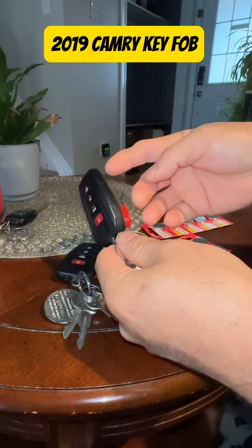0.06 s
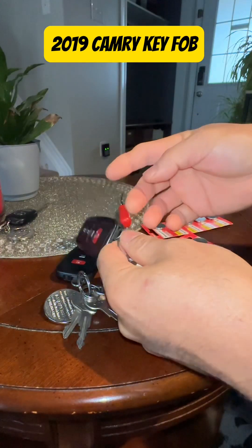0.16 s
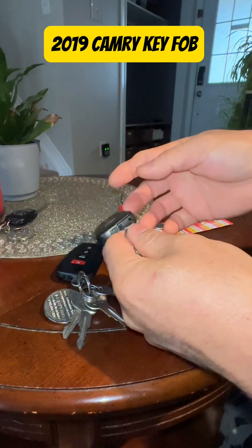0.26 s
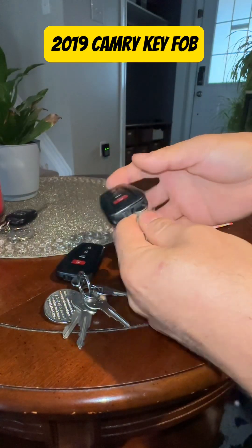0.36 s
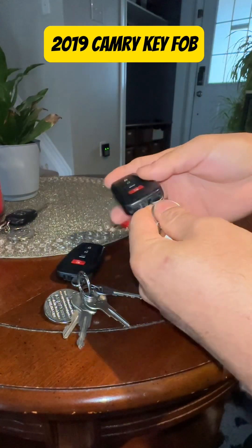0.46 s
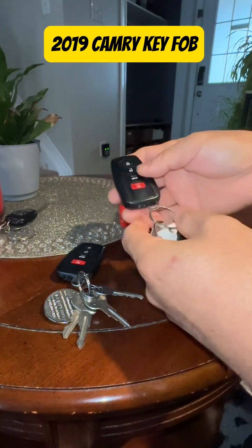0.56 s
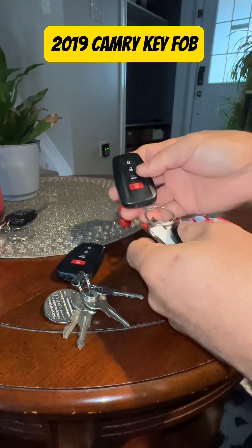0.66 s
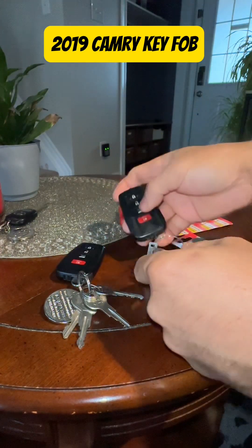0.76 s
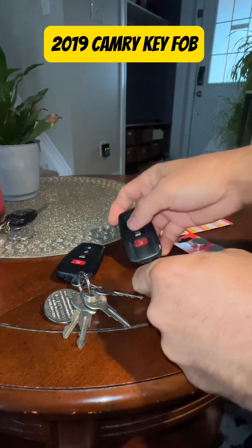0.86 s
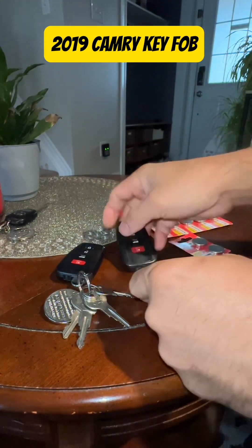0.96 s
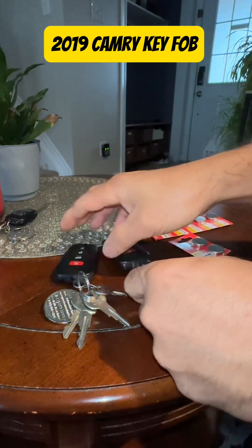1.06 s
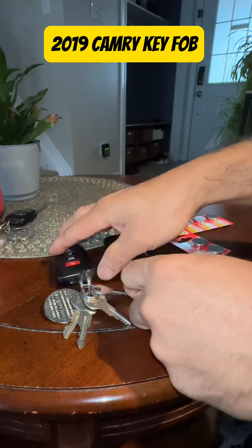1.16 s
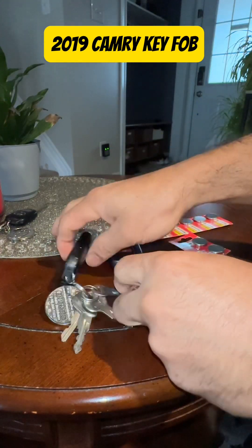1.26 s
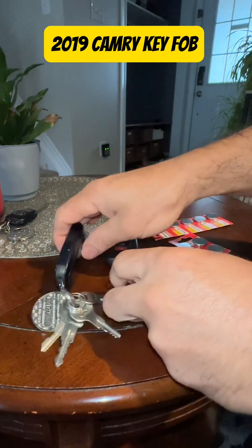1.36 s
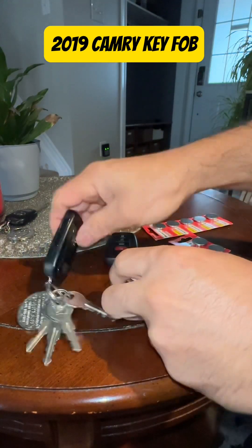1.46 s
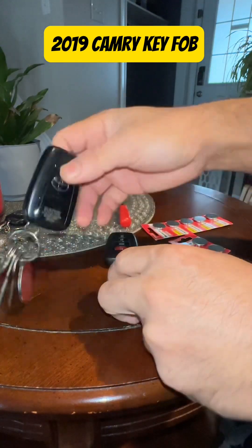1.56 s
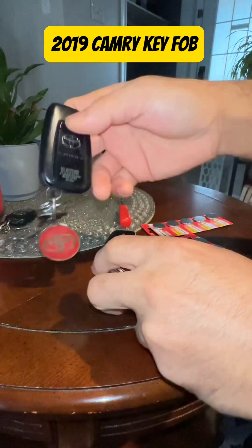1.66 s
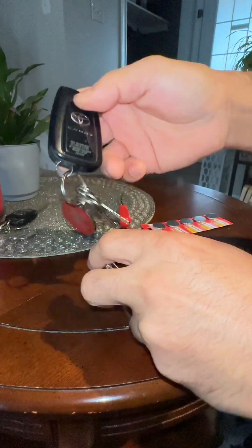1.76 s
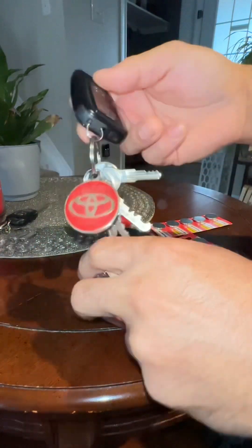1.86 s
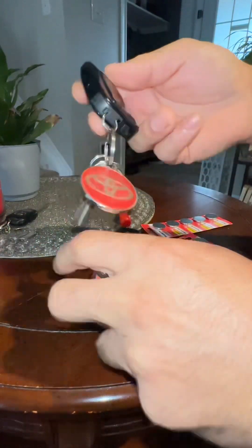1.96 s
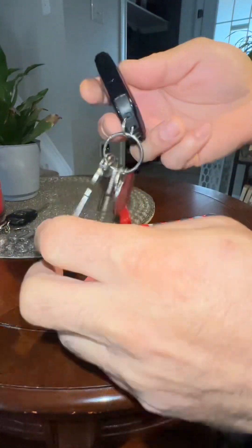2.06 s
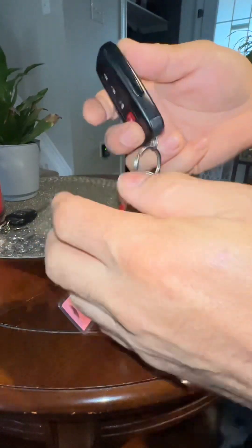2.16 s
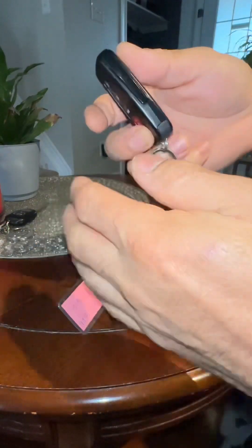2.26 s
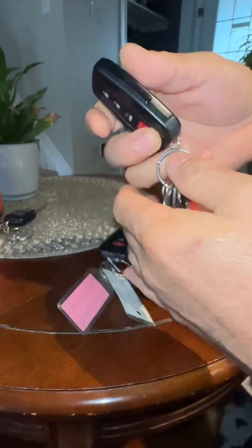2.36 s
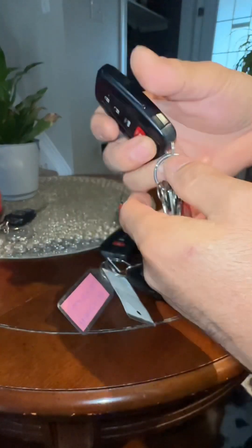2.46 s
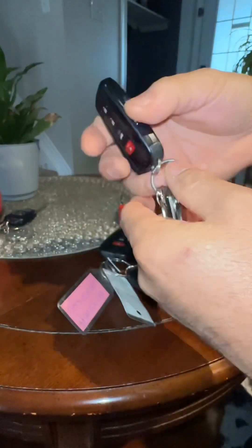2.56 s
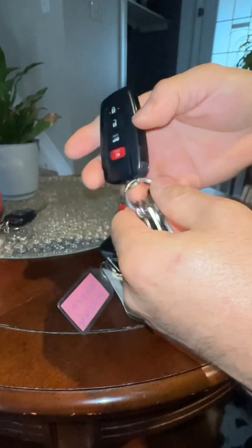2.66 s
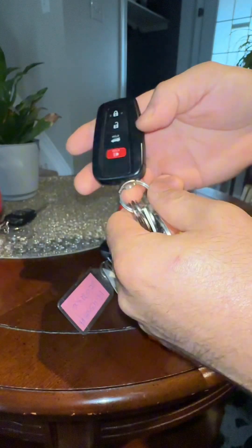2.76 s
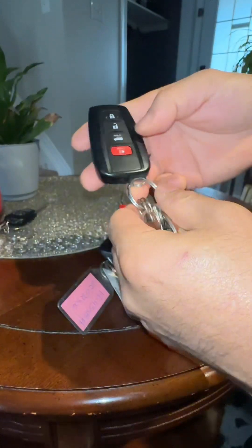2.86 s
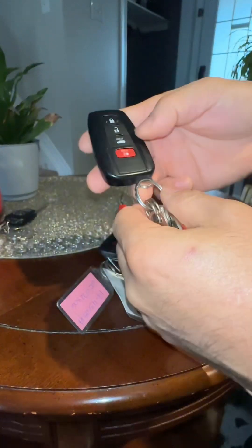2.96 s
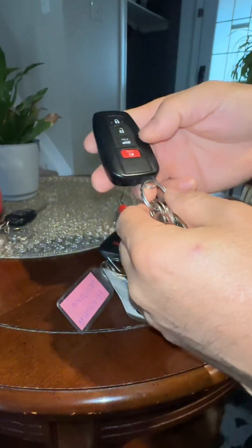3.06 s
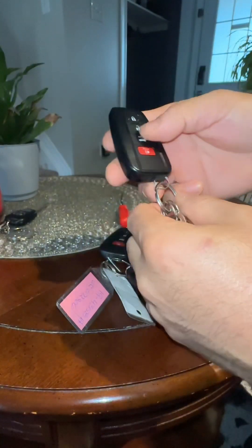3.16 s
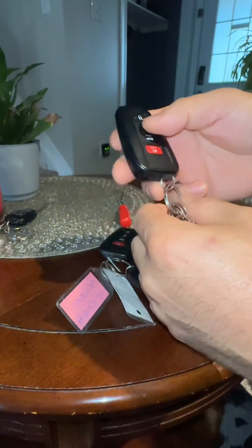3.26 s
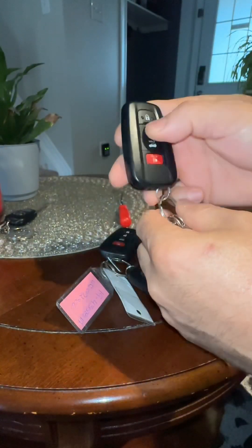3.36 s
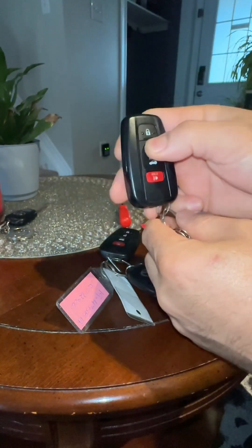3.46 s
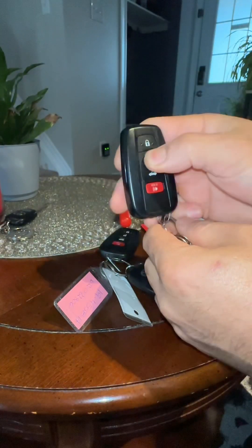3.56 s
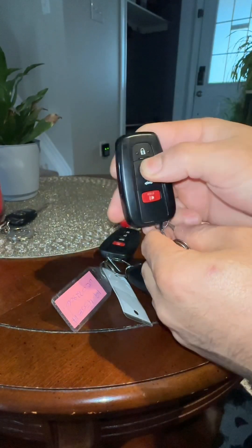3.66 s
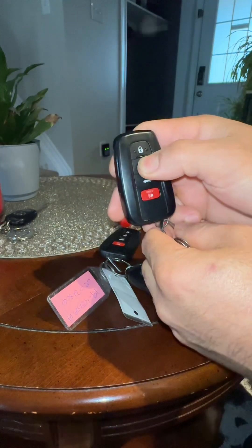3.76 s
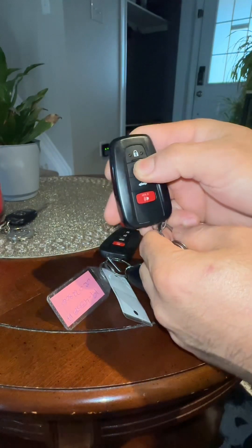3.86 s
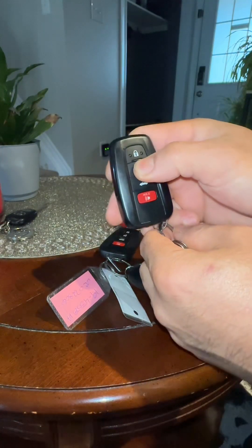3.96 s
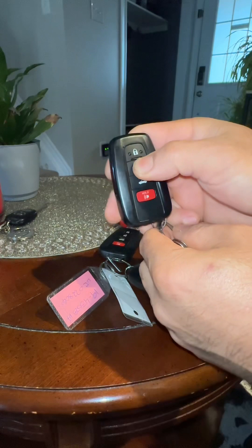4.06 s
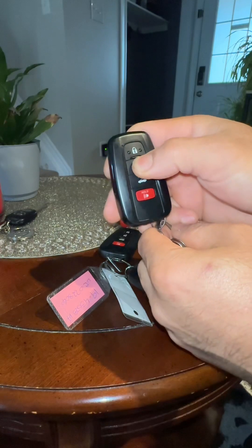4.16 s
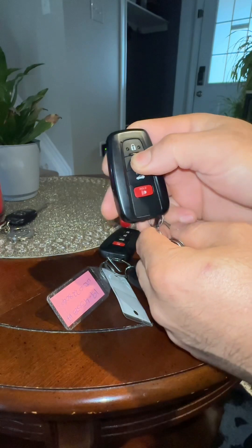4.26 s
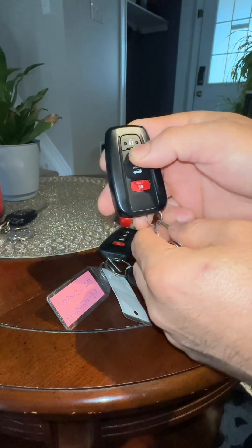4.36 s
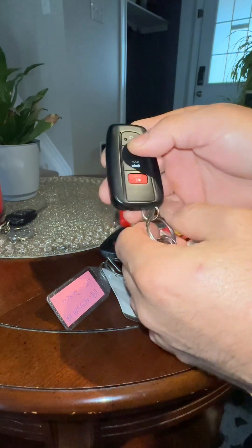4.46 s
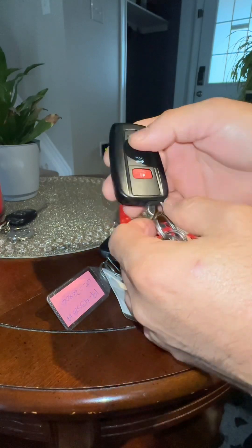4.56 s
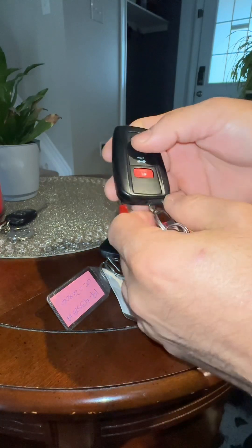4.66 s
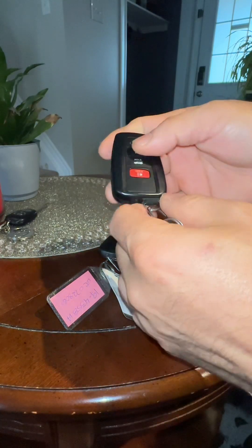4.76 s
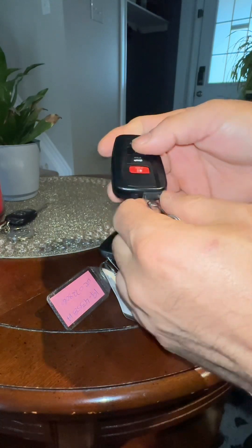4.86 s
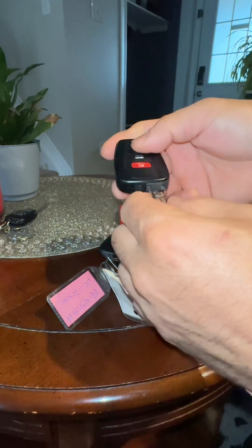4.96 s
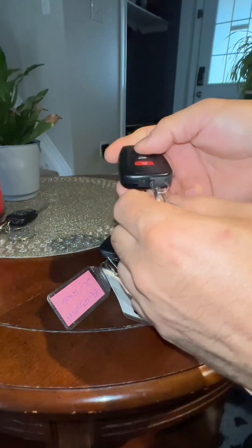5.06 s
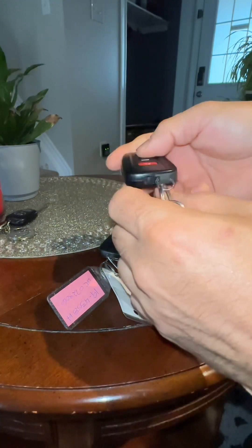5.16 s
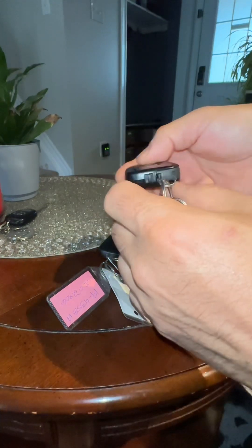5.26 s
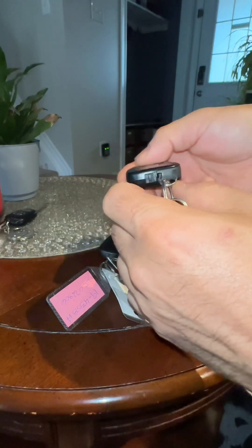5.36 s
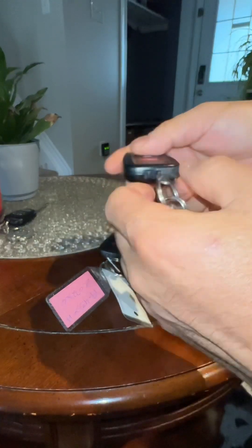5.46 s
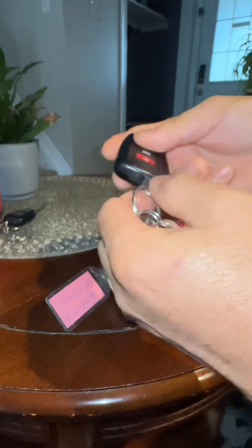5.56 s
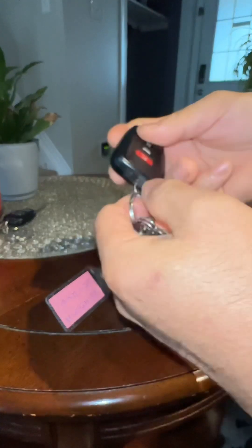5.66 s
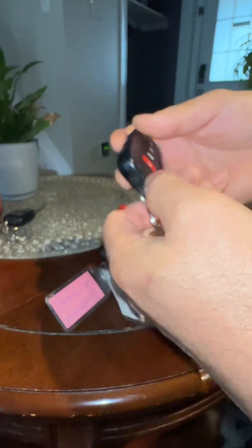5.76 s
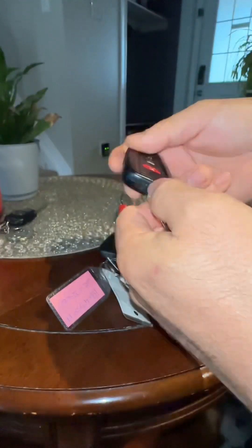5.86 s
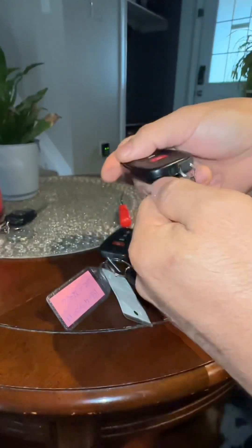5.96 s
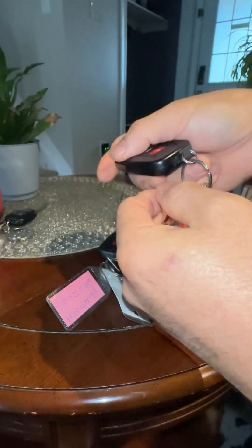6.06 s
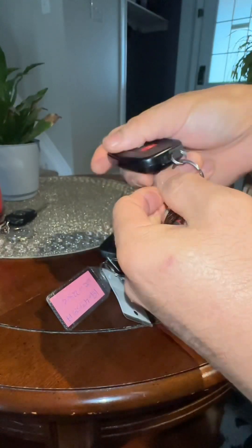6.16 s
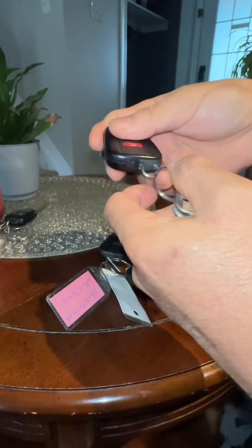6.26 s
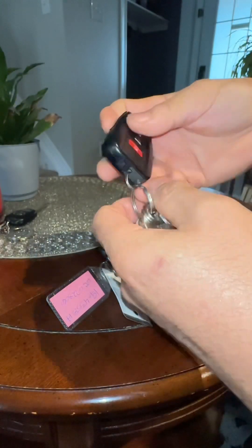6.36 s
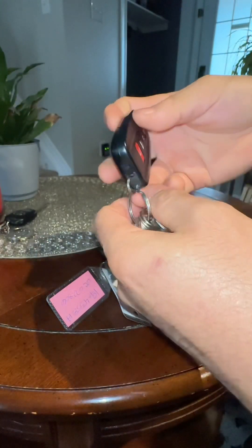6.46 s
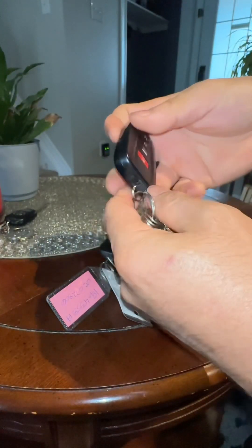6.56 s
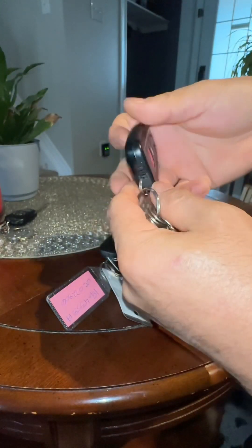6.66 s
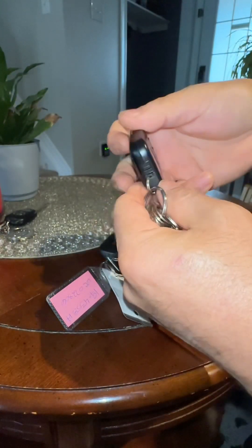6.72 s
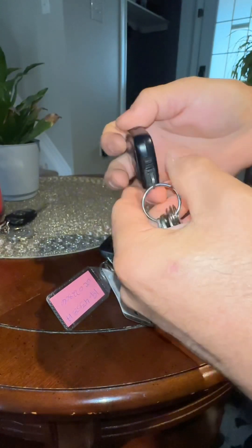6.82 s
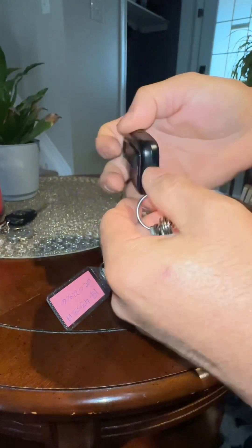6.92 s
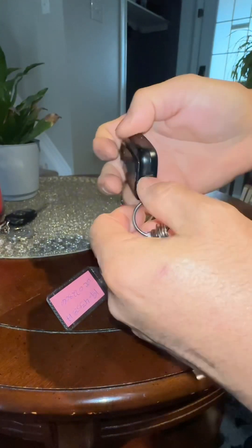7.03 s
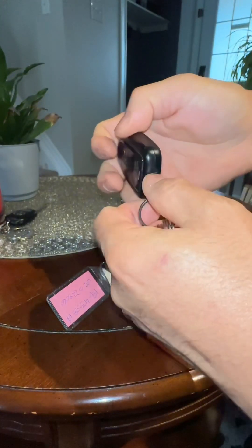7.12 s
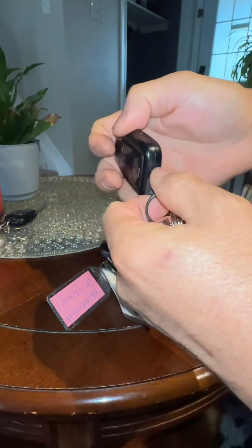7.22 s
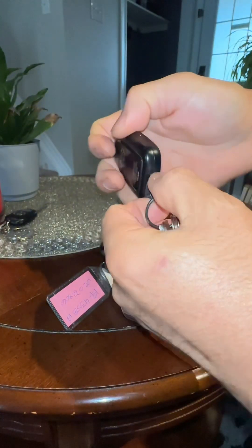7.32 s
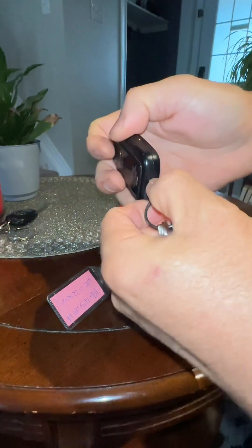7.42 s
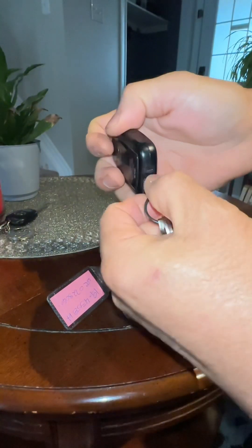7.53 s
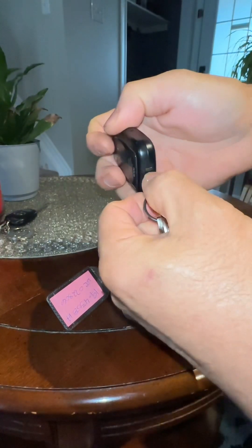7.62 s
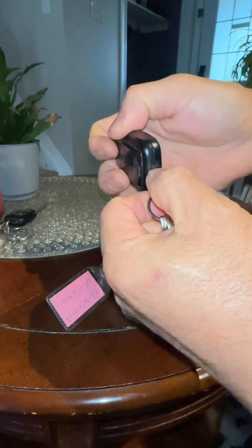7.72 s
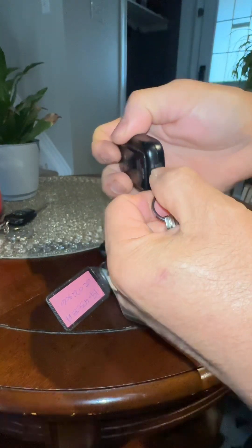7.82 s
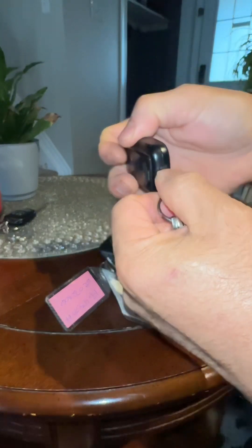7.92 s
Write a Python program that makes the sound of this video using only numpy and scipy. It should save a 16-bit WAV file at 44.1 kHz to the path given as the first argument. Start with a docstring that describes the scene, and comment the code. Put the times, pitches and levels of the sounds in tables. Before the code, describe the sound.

Small irregular clusters of metal keys and split ring, recorded near in a softly echoing room. First a clattering landing on wood with short drags, then a ringing swing of loose keys, muffled by the hand. Quiet crisp clicks come in a spaced series, then muffled thumps off to the left, one harder with a rattle, a shorter jangle, faint rubs, a tiny squeak and a snap over faint air noise and hum.

```python
"""A quiet living room: keys on a plastic fob are put down on a wooden table; a second bunch is lifted,
swings free and is gathered in the fist. Keys and split ring clink as noise cracks plus decaying modes,
coloured by the hold; wood and case knock as filtered bursts with modes, buttons click as filtered steps.
Rubs, rustles and a few ringing remnants are dense random slips, with one wavering squeak. Dull thuds come
from further off, one or two rattling, over air noise and a faint mains hum."""
import sys
import numpy as np
from scipy import signal
from scipy.fft import rfft, irfft
from scipy.io import wavfile

SR = 44100
rng = np.random.default_rng(int(sys.argv[2]) if len(sys.argv) > 2 else 0)


def generate_wav(sig):
    """Save sig (samples, or channels by samples) to the path in sys.argv[1] as 16-bit PCM at SR."""
    pcm = np.round(np.clip(np.atleast_2d(sig).T, -1, 1) * 32767).astype(np.int16)
    wavfile.write(sys.argv[1], SR, pcm)


N = 352359
TIME = np.arange(N) / SR
MEDIUM_BLOW_DB = -25

# Spectrum of a small metal contact: (frequency [Hz], level [dB])
TICK_SPECTRUM = [(800, -72), (2500, -17), (4600, 1), (6000, 7), (7400, 7.5), (9200, 3.5), (10100, -7),
                 (12000, -20.5)]
# Spectrum of the plastic case clacking: (frequency [Hz], level [dB])
CLACK_SPECTRUM = [(150, -41), (500, -3), (1100, -0.5), (1900, 4), (2800, 7.5), (3600, 6), (4700, -2),
                  (6500, -31), (11000, -52.5)]
# Spectrum of sharp metal edges: (frequency [Hz], level [dB])
SIZZLE_SPECTRUM = [(5000, -66.5), (9000, -12.5), (10500, -14), (11400, -10.5), (12100, -12.5),
                   (13600, -8.5), (14800, -1.5), (15700, -7.5), (16300, -33.5)]


def amp(db):
    """Decibels to gain."""
    return 10 ** (np.asarray(db) / 20)


def unit(x):
    """Scale to an energy of one."""
    return x / np.sqrt(np.sum(x ** 2))


def on_log(hz, points):
    """Read (Hz, value) points on a log-frequency axis."""
    point_hz, value = np.transpose(points)
    return np.interp(np.log(np.maximum(hz, 1)), np.log(np.sort(point_hz)), value)


def colour(x, points, size=2048):
    """Minimum-phase filter with the given spectral shape; white noise keeps its power."""
    gain = amp(on_log(np.fft.rfftfreq(size, 1 / SR), points))
    cepstrum = irfft(np.log(gain))
    # fold the cepstrum to make the filter causal
    cepstrum[1:size // 2] *= 2
    cepstrum[size // 2 + 1:] = 0
    impulse = unit(irfft(np.exp(rfft(cepstrum))))
    return signal.oaconvolve(x, impulse)[:N]


def butter(x, order, hz, kind):
    """Butterworth filter."""
    return signal.sosfilt(signal.butter(order, hz, kind, fs=SR, output="sos"), x)


def add(track, s, sound):
    """Mix a sound into a track at a time."""
    i = max(int(s * SR), 0)
    track[i:i + len(sound)] += sound[:max(N - i, 0)]


def contact(decay_s, chatter, chatter_s):
    """Noise crack and spiky, dying rebounds; the crack has the energy of 5 ms at rms one."""
    t = TIME[:SR // 20]
    rise = 1 - np.exp(-3 * t / decay_s)
    crack = unit(rng.standard_normal(len(t)) * rise * np.exp(-t / decay_s))
    spikes = rng.standard_normal(len(t)) ** 3
    rebounds = unit(spikes * (1 - np.exp(-t / decay_s)) * np.exp(-t / chatter_s))
    return (crack + chatter * rebounds) * np.sqrt(SR / 200)


def ring(modes, scatter_db, detune, grip, size=7000):
    """One blow on a body: the spot struck picks the modes' strengths, the fingers their damping."""
    hz, db, t60_s = np.transpose(modes)[:, :, None]
    strength, shift, hold = rng.standard_normal((3, len(hz), 1))
    t = TIME[:size]
    phase = (2 * np.pi * hz * (1 + detune * shift) * t).astype(np.float32)
    # one grip for all modes
    fade = (np.log(1000) * t / t60_s * np.exp(grip * hold[0])).astype(np.float32)
    sign = rng.choice([-1, 1], (len(hz), 1))
    gain = unit(amp(db + scatter_db * strength)) * sign
    return np.sqrt(2) * (gain * np.sin(phase) * np.exp(-fade)).sum(0)


def small_parts(t60_s, count=24):
    """Links, tags and key tips: short modes, scattered afresh at every touch."""
    hz = np.geomspace(1800, 16000, count)
    modes = np.transpose([hz, np.zeros(count), np.full(count, t60_s)])
    return ring(modes, scatter_db=5, detune=.04, grip=.3, size=SR // 20)


def strike(chatter, chatter_s, t60_s):
    """One hard contact: a crack, its rebounds and the small parts it shakes."""
    return .68 * contact(.0013, chatter, chatter_s) + .75 * small_parts(t60_s)


def flip(chatter, chatter_s):
    """One sharp step, as of a sprung dome or snapping case, with a faint noise chatter after it."""
    t = TIME[:SR // 40]
    push = chatter * unit(rng.standard_normal(len(t)) * np.exp(-t / chatter_s))
    push[0] += 1
    return push * np.sqrt(SR / 200)


def grains(rate, spread):
    """Tiny slips at random times, a few much larger than the rest; rms one."""
    size = amp(spread * np.minimum(rng.exponential(size=N), 4))
    happens = rng.random(N) < rate / SR
    return unit(happens * size * rng.standard_normal(N)) * np.sqrt(N)


def strokes(rows, attack_s, release_s):
    """Gain of strokes: each swells up to its start, holds for its length and dies away."""
    gain = np.zeros(N)
    for s, length_s, db in rows:
        swell = np.minimum(TIME - s, 0) / attack_s
        fade = np.maximum(TIME - s - length_s, 0) / release_s
        gain += amp(db) * np.exp(swell - fade)
    return gain


def damped(modes, share):
    """The same modes, dying sooner between the fingers."""
    return [(hz, db, t60_s * share) for hz, db, t60_s in modes]


def spread(pair, shared_hz):
    """The bass of a diffuse field is alike at both ports."""
    side = butter(pair[1], 2, shared_hz, "high")
    return np.array([pair[0] + side, pair[0] - side]) / np.sqrt(2)


def room(x, t60_s, treble_t60_s, air_db):
    """Diffuse echo: decaying noise, the treble dying sooner and the highest treble cut by air_db."""
    t = TIME[:SR * 3 // 4]
    tails = []
    for noise in rng.standard_normal((2, len(t))):
        low = butter(noise, 2, 3000, "low")
        tail = low * amp(-60 * t / t60_s) + (noise - low) * amp(-60 * t / treble_t60_s)
        tail = unit(tail * np.clip((t - .003) / 0.00028, 0, 1))
        dull = signal.sosfiltfilt(signal.butter(8, 9800, fs=SR, output="sos"), tail)
        tails.append(signal.oaconvolve(x, dull + amp(air_db) * (tail - dull))[:N])
    return spread(tails, shared_hz=486.5)


def ports(x):
    """A near source at the two microphone ports; the table top mirrors it to each by its own path."""
    # Phase by which the left port leads the right: (frequency [Hz], phase [rad])
    port_phase = [(100, 0), (4400, .1), (6700, -.6), (8000, -1.7), (9200, -1.6), (10300, -2.6),
                  (13300, -3.4), (14600, -4.1), (16000, -4.3)]
    hz = np.maximum(np.fft.rfftfreq(2 * N, 1 / SR), 1)
    half = np.exp(.5j * on_log(hz, port_phase))
    mirror_delay_s = np.array([[.0011], [.00122]])
    mirror = .2 * np.exp(-2j * np.pi * hz * mirror_delay_s)
    return irfft(rfft(x, 2 * N) * (np.array([half, 1 / half]) + mirror))[:, :N]


def hands(x):
    """Fingers and palms scatter the treble by different short paths to each port."""
    t = TIME[:SR // 200]
    paths = butter(rng.standard_normal((2, len(t))) * np.exp(-t / .002), 2, 3000, "high")
    return amp(-15) * np.array([signal.oaconvolve(x, unit(path))[:N] for path in paths])


def room_tone():
    """Steady coloured air noise and a hum of sines whose phase wavers slightly."""
    # Air noise spectrum: (frequency [Hz], level [dB])
    air_spectrum = [(15, -65.5), (25, -18.5), (123, -1), (185, -15), (242, -11), (394, -15), (677, -16.5),
                    (796, -21.5), (2110, -30), (2610, -32), (4030, -32.5), (7510, -37.5), (9320, -45),
                    (10100, -73), (16000, -81)]
    # Appliance hum: (frequency [Hz], rms level [dB])
    hum_partials = [(60, -71), (119.6, -63.5), (239, -72.5), (680, -74)]
    noises = rng.standard_normal((2, N))
    air = spread([colour(noise, air_spectrum, size=8192) for noise in noises], shared_hz=257)
    hum = 0
    for hz, db in hum_partials:
        waver = signal.resample(rng.standard_normal(40), N)
        hum = hum + amp(db) * np.sqrt(2) * np.sin(2 * np.pi * hz * TIME + 0.54 * waver)
    return amp(-58.0) * air + hum


def thuds():
    """Soft noise blows off to the left, with hollow body and floor boom; the hardest has a bright rattle."""
    # Blows: (time [s], level [dB], decay time [s], boom [dB], body resonance [Hz], body [dB])
    blows = [(0.0, -55.5, 0.011, -41.5, 234, -50.5), (0.493, -46, 0.01, -42.5, 328, -66),
             (.565, -60.5, 0.086, -54, 326, -61), (4.181, -44.5, 0.03, -39.5, 194, -78),
             (4.752, -37.5, 0.028, -41, 478, -43.5), (4.846, -41, 0.013, -34, 400, -42.5),
             (5.055, -50, 0.0047, -54, 240, -41), (5.412, -25, 0.015, -28, 357, -41),
             (5.71, -36.5, 0.0086, -38, 378, -42.5), (6.262, -60, 0.038, -57, 343, -57),
             (7.756, -60, 0.02, -54.5, 311, -70), (7.85, -54.5, 0.016, -45.5, 380, -65.5)]
    # Blow spectrum: (frequency [Hz], level [dB])
    thud_spectrum = [(40, -51), (110, -8), (190, -10), (290, -2), (380, 0), (490, -5), (665, 3), (760, -2),
                     (870, 1), (1020, -5), (1350, -9.5), (1850, -9.5), (4000, -16.5), (8800, -21),
                     (9900, -29), (11000, -74)]
    # Floor boom spectrum: (frequency [Hz], level [dB])
    boom_spectrum = [(28, -39), (50, 2.5), (90, 3.5), (135, 0.5), (200, -7.5), (500, -54), (2000, -105)]
    push, boom, body, rattle = np.zeros((4, N))
    t = TIME[:SR // 3]
    for s, db, decay_s, boom_db, body_hz, body_db in blows:
        judder = amp(1.5 * signal.resample(rng.standard_normal(40), len(t)))
        shake = rng.standard_normal(len(t)) * judder * (1 - np.exp(-t / 0.0058))
        blow = shake * np.exp(-t / decay_s)
        add(push, s, amp(db + 5.0) * blow)
        add(boom, s, amp(boom_db) * blow)
        hollow = [(body_hz / 2, -28), (body_hz / 1.2, -8), (body_hz, 0),
                  (body_hz * 1.2, -8), (body_hz * 2, -28)]
        add(body, s, amp(body_db) * colour(blow, hollow))
        # so steep that only the hardest blow rattles audibly
        rattle_db = db + 1 + 10.5 * (db - MEDIUM_BLOW_DB)
        rattle_gain = (1 - np.exp(-t / 0.013)) * np.exp(-t / 0.019)
        add(rattle, s, amp(rattle_db) * shake * rattle_gain)
    far = body + colour(push, thud_spectrum) + colour(boom, boom_spectrum, size=8192)
    far += colour(rattle, TICK_SPECTRUM) + amp(-20.5) * colour(rattle, CLACK_SPECTRUM)
    direct = np.array([far, np.roll(far, 24)])  # right port 24 samples late
    return direct + amp(3.5) * room(far, t60_s=0.46, treble_t60_s=0.39, air_db=-46)


def table():
    """Knocks and drags sound the wooden top; the case clacks and the wall that lands rings briefly."""
    # Fob and keys landing: (time [s], wood [dB], case clack [dB], wall pitch [Hz])
    knocks = [(0.857, -43.5, -33, 3020), (0.8999, -22, -18.5, 1820), (.903, -31, -42, 3330),
              (0.9172, -21.5, -25, 3160), (0.925, -31.5, -38.5, 3300), (1.0614, -29.5, -22, 2180),
              (1.075, -23, -40, 1700), (1.104, -42, -53, 2600), (1.117, -55, -45, 3640),
              (1.157, -39.5, -42, 1710), (1.178, -37.5, -58, 1740), (1.2071, -29, -25, 2890),
              (1.2144, -30.5, -20, 1700), (1.263, -60, -23, 2730), (1.2725, -34, -19.5, 3140),
              (1.2764, -28.5, -32.5, 3820), (1.335, -44, -39, 2800), (1.387, -45, -49, 1710),
              (1.467, -39.5, -27.5, 1120), (1.858, -39.5, -43.5, 2770)]
    # Bunch dragged over the top: (start [s], length [s], level [dB])
    drags = [(1.07, 0.2, -52.5), (1.26, 0.11, -49.5), (1.47, 0.069, -55), (1.67, 0.079, -50.5)]
    # Table top modes: (frequency [Hz], level [dB], t60 [s])
    table_modes = [(195, -1, .14), (323, -10, .25), (390, -14, .2), (447, -16, .18), (508, -11, .2),
                   (585, -1, .13), (660, 9, .035), (745, 13, .03), (765, -4, .15), (813, -5, .13),
                   (894, -2, .17), (1040, -7, .13), (1175, -13, .08), (1415, -14, .09)]
    # Plastic case modes: (frequency [Hz], level [dB], t60 [s])
    case_modes = [(1410, 15, 0.029), (1840, 3, 0.027), (2214, 1.5, .03), (2600, -7.5, .07),
                  (2700, -2, 0.066), (3110, 5, 0.038), (3190, 12, 0.033), (3700, -1, 0.061)]
    # Wood push spectrum: (frequency [Hz], level [dB])
    wood_spectrum = [(40, -47.5), (120, -15.5), (180, -6.5), (380, -5.5), (600, 4.5), (830, -6.5),
                     (1100, -5.5), (1700, -15), (4000, -41)]
    push, ringing, clack = np.zeros((3, N))
    for s, db, clack_db, hz in knocks:
        add(push, s, amp(db - 6.0) * contact(decay_s=0.0044, chatter=0.97, chatter_s=0.0018))
        top = ring(table_modes, scatter_db=3.5, detune=0.004, grip=0.05)
        add(ringing, s, amp(db + 2.5) * top)
        case = ring(case_modes, scatter_db=1, detune=.012, grip=0.16, size=4000)
        add(ringing, s, amp(clack_db - 8.5) * case)
        wall_modes = [(hz, 0, 0.024), (hz * 0.97, -5, 0.024)]
        wall = ring(wall_modes, scatter_db=4.5, detune=0.012, grip=.2, size=2000)
        add(ringing, s, amp(clack_db - 8.5) * wall)
        add(clack, s, amp(clack_db - 6) * strike(chatter=0.17, chatter_s=0.0016, t60_s=.013))
    drag = grains(rate=550, spread=1.3) * strokes(drags, attack_s=0.0205, release_s=0.03)
    return ringing + colour(push + drag, wood_spectrum) + colour(clack, CLACK_SPECTRUM)


def scrapes():
    """Rubbing and a few remnants of ringing and rattle: halting swells of slips, each in its own band."""
    # Rubbing of plastic, metal and fingers; the row at 4.79 s is the crackling rattle of a dull thud;
    # the narrowest rows are ringing left after a clink: a key near 5.5 kHz, the split ring near 3.7 kHz:
    # (loudest time [s], half length [s], level [dB], centre [Hz], width [octaves])
    swells = [(0.012, 0.035, -49.5, 258, 0.76), (0.235, 0.0054, -49, 3200, .4),
              (0.294, 0.05, -56.5, 3360, 0.32), (0.563, 0.15, -50.5, 348, 1.22),
              (6.274, 0.034, -51, 335, 1.3), (0.604, 0.079, -62, 6300, 0.81), (1.298, 0.26, -51, 2060, 3),
              (1.487, 0.1, -43.5, 1116, 0.44), (1.509, 0.074, -48, 2110, 1), (1.796, 0.18, -50.5, 1390, 5),
              (2.515, 0.1, -56.5, 5540, 0.028), (4.579, 0.032, -60, 2920, 0.85),
              (4.79, 0.073, -50, 2300, 1.6), (1.145, 0.081, -42.5, 604, 0.83),
              (6.241, 0.16, -61, 3170, 1.9), (6.398, 0.11, -55.5, 3670, 0.17),
              (6.82, 0.098, -59.5, 3560, 0.27), (6.939, 0.0096, -46, 3700, 0.26),
              (3.343, 0.21, -60.5, 482, 0.95), (3.388, 0.33, -60, 1880, 1.9), (7.168, .11, -55, 1965, 3.5),
              (7.212, 0.0066, -48.5, 1700, 0.95), (7.877, 0.076, -56, 790, 1.15)]
    catching = amp(2.5 * signal.resample(rng.standard_normal(900), N))
    slips = catching * grains(rate=4000, spread=1.8)
    out = np.zeros(N)
    for s, half_length_s, db, hz, octaves in swells:
        start_s = max(s - half_length_s, 0)
        stretch = slips[int(start_s * SR):int((s + half_length_s) * SR)]
        edges_hz = np.minimum(hz * 2 ** (np.array([-.5, .5]) * octaves), .45 * SR)
        band = butter(stretch, 2, edges_hz, "band")
        add(out, start_s, amp(db) * band / band.std() * np.hanning(len(band)))
    return out


def squeak(start_s, length_s, hz, db):
    """A thumb sticks and slips on the glossy case: a tone and its octave, wavering in pitch and level."""
    t = TIME[:int(length_s * SR)]
    waver, grip = signal.resample(rng.standard_normal((2, 12)), len(t), axis=1)
    phase = 2 * np.pi * np.cumsum(hz * (1 + 0.015 * waver)) / SR
    tone = np.sin(phase) + amp(-10) * np.sin(2 * phase)
    swell = np.interp(t / length_s, [0, .25, 1], [0, 1, .15])
    out = np.zeros(N)
    add(out, start_s, amp(db + 2 * grip) * tone * swell)
    return out


def buttons():
    """A sharp snap and the pop of the small hollow case with it, damped at once by the grip."""
    # Fob buttons pressed and let go; the last row is the fob case snapping:
    # (time [s], case pop [dB], snap [dB], pitch [ratio])
    clicks = [(3.4147, -37.5, -32.5, 1.03), (3.6103, -37.5, -50, 0.99), (3.735, -37.5, -34, 1.08),
              (3.856, -38, -49, 0.98), (3.9876, -37, -34, 1.08), (4.077, -34, -45, 0.97),
              (4.1733, -33.5, -32.5, 1.04), (4.2914, -34.5, -41, 0.95), (7.507, -35.5, -28, 0.91)]
    # Hollow case spectrum: (frequency [Hz], level [dB])
    pop_spectrum = [(250, -31), (700, -10), (1400, -3), (1850, -8), (2200, 10.5), (2750, 3.5),
                    (3200, -16.5), (5000, -8), (10000, -57)]
    # Snap spectrum: (frequency [Hz], level [dB])
    snap_spectrum = [(300, -67.5), (1500, -11.5), (3300, -11.5), (4100, -10.5), (4650, -2), (5300, -5),
                     (6450, 2.5), (7050, -7.5), (7700, -9.5), (8600, -8), (10300, -33), (13000, -25),
                     (15000, -29)]
    out = np.zeros(N)
    for s, pop_db, snap_db, pitch in clicks:
        pop_points = [(hz * pitch, db) for hz, db in pop_spectrum]
        snap_points = [(hz * pitch, db) for hz, db in snap_spectrum]
        pop = colour(flip(chatter=0.3, chatter_s=0.0022), pop_points, size=256)
        snap = colour(flip(chatter=0.57, chatter_s=0.0014), snap_points, size=256)
        add(out, s, amp(pop_db) * pop)
        add(out, s, amp(snap_db) * snap)
    return out


def rustle(motion):
    """A dense run of tiny slips between the clinks, in the colours of metal, case and sharp edges."""
    slips = grains(rate=2000, spread=4.2) * motion
    tick = amp(-12.0) * colour(slips, TICK_SPECTRUM)
    clack = amp(-13.0) * colour(slips, CLACK_SPECTRUM)
    sizzle = amp(-24.0) * colour(slips, SIZZLE_SPECTRUM)
    return tick + clack + sizzle


def touches(motion, count=200):
    """Light contacts at random moments during the rustle: rows like the clear ones."""
    rate_per_s, level_db, scatter_db, ringing_db = 8.2, -4.5, 20.5, -7
    when, luck, size, part = rng.random((count, 4)).T
    hz = 3000 * 3 ** part
    moving_db = 20 * np.log10(motion[(when * N).astype(int)] + 1e-9)
    db = moving_db + level_db + scatter_db * (2 * size - 1)
    happens = (luck < rate_per_s * N / SR / count) & (moving_db > -60)
    rows = zip(when[happens] * N / SR, db[happens], hz[happens])
    return [(s, blow_db, blow_db + ringing_db, pitch_hz) for s, blow_db, pitch_hz in rows]


def keys(motion):
    """Contacts crack, clack on the case and ring keys and split ring until a clear contact stops them."""
    # Clear metal contacts: (time [s], blow [dB], ringing [dB], pitch of the part struck [Hz])
    clinks = [(0.0326, -35.5, -32, 4860), (0.573, -40, -28, 8900), (0.68, -34.5, -26.5, 7110),
              (0.692, -57, -48, 8870), (0.7127, -32.5, -33, 9040), (0.7568, -39, -44, 2830),
              (0.768, -47, -42, 6900), (0.783, -44, -39.5, 6600), (0.856, -34, -34, 8700),
              (0.861, -39, -37, 8850), (0.876, -35, -36, 7100), (0.884, -43, -31, 8860),
              (0.8988, -22.5, -42, 9050), (0.914, -26, -19.5, 8580), (0.954, -34.5, -43.5, 8400),
              (1.059, -22.5, -20, 9340), (1.1042, -32.5, -42, 7130), (1.183, -40.5, -29, 8700),
              (1.215, -29.5, -33, 8600), (1.226, -32, -45.0, 8000), (1.2614, -29.5, -27.5, 9520),
              (1.272, -30, -32, 7060), (1.2796, -35, -32, 9090), (1.3523, -38, -56, 7000),
              (1.427, -41.5, -53, 7300), (1.4592, -40, -26.5, 8940), (1.466, -38, -31, 9130),
              (1.476, -43, -25, 9500), (1.4935, -31, -26, 9080), (1.541, -35, -35, 8980),
              (1.554, -32.5, -30.5, 9140), (1.566, -34, -37.5, 9200), (1.631, -34.5, -34, 9080),
              (1.638, -51, -36.5, 9230), (1.727, -39.5, -35, 9120), (1.736, -37, -25.5, 9050),
              (1.7515, -35, -28.5, 8200), (1.7606, -32, -32, 8480), (1.7728, -52, -53, 8300),
              (1.7906, -29, -31, 6060), (1.796, -39, -48.0, 8000), (1.8162, -36.5, -40, 7400),
              (1.852, -38, -43, 2770), (1.9385, -58, -39, 9100), (1.969, -44.5, -51, 9060),
              (2.0584, -36.5, -34, 5480), (2.07, -33.5, -27.5, 7530), (2.077, -34.5, -25, 8830),
              (2.0943, -36, -21.5, 9020), (2.122, -56, -25.5, 9040), (2.1476, -37, -22, 8330),
              (2.153, -32.5, -24, 8960), (2.163, -40, -31, 8900), (2.1738, -39, -29, 9110),
              (2.1853, -35, -13.5, 8980), (2.2111, -35, -23, 7870), (2.215, -33.5, -43, 8100),
              (2.224, -42, -32.0, 9200), (2.3236, -48.5, -62, 8100), (2.3413, -50, -60.0, 9130),
              (2.382, -43, -53, 4030), (2.41, -39, -24.5, 8980), (2.42, -38.5, -32, 8960),
              (2.439, -28, -22, 9020), (2.446, -29, -26, 8000), (2.5323, -42.5, -33, 7800),
              (2.644, -60, -52, 9800), (2.6739, -44.5, -41.5, 7960), (2.715, -50, -46, 3840),
              (2.734, -52, -49, 4100), (3.482, -52, -56.5, 6900), (3.504, -58, -55, 3740),
              (3.569, -59, -46, 2830), (3.581, -73, -50, 3800), (3.881, -58, -57, 5950),
              (4.081, -49, -62, 5870), (4.3024, -51, -50.5, 6120), (4.339, -56, -39.5, 2020),
              (4.348, -40, -49, 7460), (4.506, -61, -39.5, 9180), (4.535, -54, -45.5, 2010),
              (4.559, -62, -32.5, 9180), (4.581, -34, -27, 9100), (4.672, -50, -43, 9300),
              (4.704, -29.5, -24, 7800), (5.06, -43.5, -54, 7100), (5.1278, -40, -33.5, 7470),
              (5.621, -42, -54, 8140), (5.6469, -35, -30.5, 8330), (5.862, -37.5, -31.5, 8020),
              (5.939, -38.5, -56, 8300), (5.9733, -38.5, -53, 8440), (6.047, -44.5, -35, 8380),
              (6.054, -48, -41.5, 1870), (6.095, -44.5, -54, 8000), (6.112, -40, -18.5, 8030),
              (6.141, -37.5, -33, 8060), (6.147, -39, -34, 8500), (6.1743, -31.5, -24, 8100),
              (6.1837, -30, -23, 7980), (6.193, -36, -38.5, 8300), (6.2021, -31, -24, 9030),
              (6.21, -31, -51.0, 10500), (6.2858, -46, -38, 8600), (6.299, -41, -60.0, 7670),
              (6.3392, -35, -30, 9090), (6.345, -28.5, -24, 9000), (6.3559, -23.5, -15.5, 8160),
              (6.368, -33, -20.5, 8270), (6.43, -54, -42, 3860), (6.507, -40.5, -44, 4040),
              (6.64, -50.5, -46, 3560), (6.767, -45.5, -39, 9000), (6.804, -40.5, -34, 7600),
              (6.847, -41, -38, 8300), (6.862, -46, -43, 7540), (6.9141, -34, -29, 7860),
              (6.941, -39.5, -41, 3660), (6.965, -43, -45, 4240), (7.0217, -46, -63, 9000),
              (7.1495, -49.5, -67.0, 2560), (7.207, -46, -55, 3840), (7.3748, -46.5, -54.5, 9300),
              (7.5078, -28, -28, 7400), (7.587, -44, -60, 7800)]
    # Hold of the bunch: lowered to the table; second bunch swinging free; keys gathered in the fist;
    # split ring pinched against the fob:
    # (from [s], case clack [dB], edge sizzle [dB], keys [dB], split ring [dB], ringing time [ratio])
    holds = [(0, -20.5, -17.5, -15, -17, 0.38), (1.25, -16, 5.5, -11.5, -6, 0.77),
             (2.425, -17, 2, -20.5, -2, 0.37), (6.6, -17, 4, -20, -16, 0.27)]
    # Key modes: (frequency [Hz], level [dB], t60 before the hold damps it [s])
    key_modes = [(5630, -19, .1), (7270, -5, .1), (8360, -17, .09), (8360, 1.5, .08), (9220, 1.5, 0.11),
                 (9000, 4.5, 0.058), (10400, -8.5, 0.092), (12500, -6, 0.036), (13760, -4.5, 0.064),
                 (14800, 12, 0.12), (15520, -11.5, .046)]
    # Split ring modes: (frequency [Hz], level [dB], t60 before the hold damps it [s])
    ring_modes = [(3580, -19.5, 0.048), (4560, -6, 0.02), (5440, -16.5, 0.041), (8400, 4, 0.03),
                  (8000, 3, 0.039), (9100, -1, 0.027), (10220, -23.5, .05), (10600, -2, 0.03),
                  (12400, -6, .045), (13750, 2, .04), (14506, -4, .07), (15350, -6.5, .04)]
    cluster_s = 0.015
    tick, clack, sizzle, metal = np.zeros((4, N))
    clear_s = np.array([row[0] for row in clinks])
    for s, db, ringing_db, hz in clinks + touches(motion):
        hold = holds[sum(s >= later[0] for later in holds[1:])]
        _, clack_db, sizzle_db, key_db, ring_db, share = hold
        before_s = s - clear_s[clear_s < s].max(initial=-1)
        after_s = clear_s[clear_s > s].min(initial=N / SR) - s
        # inside a cluster the parts already graze each other as they close in
        lead = SR // 80
        graze = rng.standard_normal(lead) * np.linspace(0, 1, lead)
        graze *= amp(-2.5) * np.exp(-before_s / cluster_s)
        # a lone contact is crisp; close neighbours make it rebound
        chatter = 0.1 + 1.08 * np.exp(-min(before_s, after_s) / cluster_s)
        hit = strike(chatter, chatter_s=0.01684, t60_s=.034)
        blow = amp(db) * np.concatenate([graze, hit])
        start_s = s - lead / SR
        add(tick, start_s, amp(-5.5) * blow)
        add(clack, start_s, amp(clack_db) * blow)
        # harder blows are brighter
        add(sizzle, start_s, amp(sizzle_db + 0.65 * (db - MEDIUM_BLOW_DB)) * blow)
        # the part struck, with a close twin mode that beats, shakes the keys and the split ring
        struck = damped([(hz, 0, 0.05), (hz * 1.009, -8.5, 0.05)], share)
        tone = ring(struck, scatter_db=6, detune=.001, grip=.15)
        others = ring(damped(key_modes, share), scatter_db=5, detune=0.0072, grip=0.45)
        split_ring = ring(damped(ring_modes, share), scatter_db=1.5, detune=0.025, grip=0.22)
        tone = tone + amp(key_db) * others + amp(ring_db) * split_ring
        t = TIME[:len(tone)]
        stopped = np.exp(-np.maximum(t - after_s, 0) / 0.0073)
        build_up = 1 - np.exp(-t / .001)
        add(metal, s, amp(ringing_db) * tone * stopped * build_up)
    cracks = colour(tick, TICK_SPECTRUM) + colour(clack, CLACK_SPECTRUM)
    return cracks + colour(sizzle, SIZZLE_SPECTRUM) + metal


def scene():
    """Hands and table near the phone, the room behind them."""
    # Rustle of keys and fingers; the row at 4.18 s is the rattle of a dull thud:
    # (start [s], length [s], level [dB])
    rustles = [(0, 0.021, -52.5), (.52, 0.14, -50), (.95, 0.37, -50.5), (1.53, 0.33, -47.5),
               (2.08, 0.24, -58), (2.44, 0.23, -51.5), (3.25, 0.14, -58.5), (4.18, 0.14, -48),
               (5.15, 0.079, -64), (5.6, 0.46, -58), (6.18, 0.13, -48.5), (6.5, 0.24, -66.5),
               (7.55, 0.15, -59.5)]
    motion = strokes(rustles, attack_s=0.02, release_s=0.12)
    metal = keys(motion) + rustle(motion)
    clicks, wood = buttons(), table()
    rubbing = scrapes() + squeak(start_s=7.422, length_s=0.09, hz=1385, db=-56)
    # the small case sends little but its treble out into the room
    far_clicks = butter(clicks, 2, 4000, "high")
    sent = amp(-7.0) * (metal + rubbing) + amp(-14) * far_clicks + amp(-7.5) * wood
    echo = room(sent, t60_s=0.45, treble_t60_s=0.31, air_db=-33.0)
    near = ports(metal + clicks + wood + rubbing) + hands(metal)
    return near + echo + thuds() + room_tone()


def record(dry):
    """The phone cuts the top with a steep low-pass."""
    top_hz = 16400
    return signal.sosfilt(signal.ellip(8, .2, 70, top_hz, fs=SR, output="sos"), dry)


dry = scene()
out = record(dry)
generate_wav(out)
```